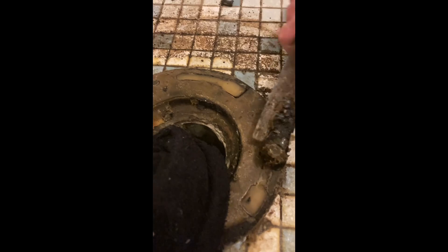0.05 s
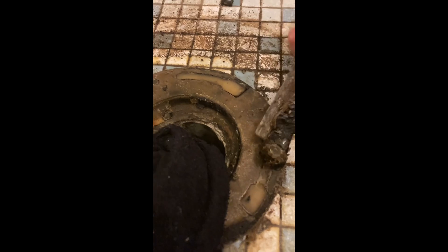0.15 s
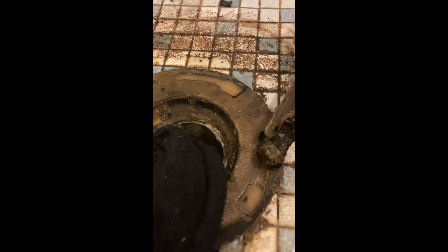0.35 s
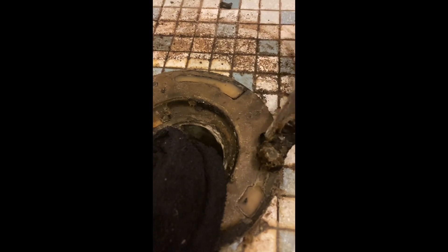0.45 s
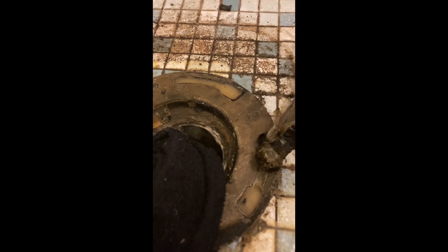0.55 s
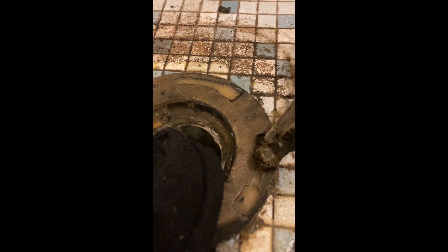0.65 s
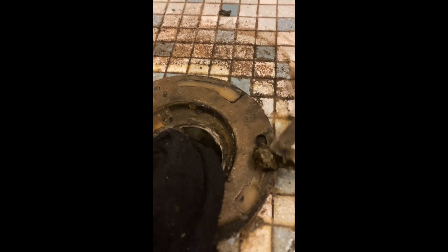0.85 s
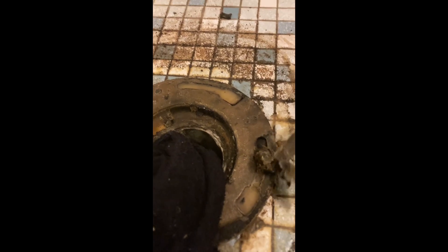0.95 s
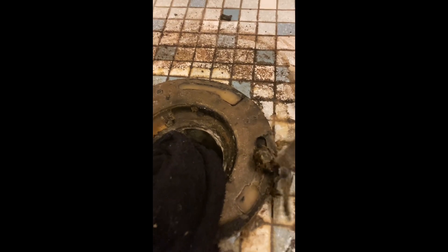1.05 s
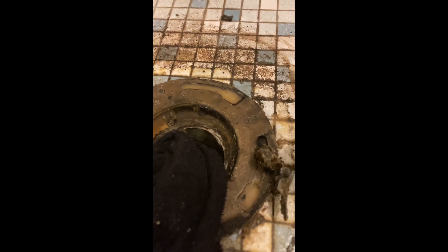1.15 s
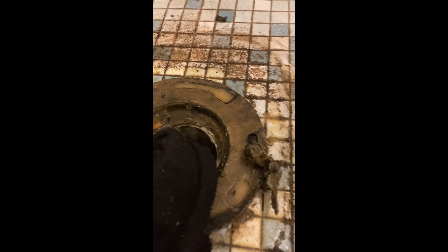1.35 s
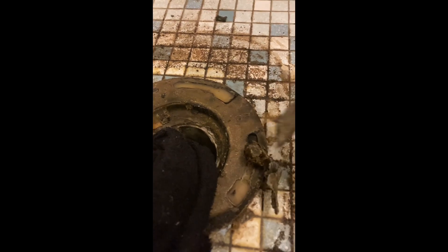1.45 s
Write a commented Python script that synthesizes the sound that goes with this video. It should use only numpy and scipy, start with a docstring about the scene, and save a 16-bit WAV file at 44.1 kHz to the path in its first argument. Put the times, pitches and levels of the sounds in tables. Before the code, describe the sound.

A steel scraper works at a crusted pipe flange, heard close in a small tiled room. A faint scrape leads into quick booming knocks and sharp cracks from 0.2 to 0.3 seconds. More crust snaps around 0.5 and 0.7 seconds, with soft bumps on tile. A gritty sliding hiss continues until about 1.5 seconds, with dull bumps near 1.15. A quiet low hum lies underneath.

```python
"""A faint scrape runs into a quick cluster of booming knocks and sharp cracks, then a gritty hiss.
A steel scraper is pushed into the caked rim (the flange) of a pipe on a tiled floor, in a small room.
The blade knocks the flange, which booms with its pipe, and bits of crust snap off.
The tool slides on, hissing over grime and bumping on the tiles.
A close pair of microphones hears it over a quiet room hum."""
import sys
import numpy as np
from scipy import signal
from scipy.fft import rfft, irfft
from scipy.io import wavfile

SR = 44100
rng = np.random.default_rng(int(sys.argv[2]) if len(sys.argv) > 2 else 0)


def store_pcm(level_fs):
    """Save levels as 16-bit WAV."""
    pcm = np.round(np.clip(level_fs, -1, 1) * 32767).astype(np.int16)
    wavfile.write(sys.argv[1], SR, np.atleast_2d(pcm).T)


N = 66150

# blows of the blade on the flange: t/s, level/dB, contact time/ms
FLANGE_BLOWS = [(.19, -47.5, 0.59), (.206, -36, 1.4), (.2232, -36.5, 0.88), (.2283, -29, 1.42),
                (.2832, -30.5, 3.95), (.51, -49.5, 3.5)]
# tones that the flange and pipe ring with: f/Hz, level/dB, time to fade by 60 dB/s
FLANGE_TONES = [(70.2, -26, 1), (104.5, -10.5, 0.27), (127.1, -1.5, 0.34), (149, -14, 0.56),
                (192.2, -12, 0.28), (235, -16.5, 0.32), (329.7, 0.5, 0.18), (377, -11, 0.06),
                (462, -2, 0.18), (575, -8.5, 0.14)]
def flange_knocks():
    """The blade hits the flange, which booms together with its pipe."""
    return strike(FLANGE_BLOWS, FLANGE_TONES)


# bumps of the tool on the tiles: t/s, level/dB, contact time/ms
TILE_BLOWS = [(.57, -51.5, 3.5), (.669, -62, 1.3), (.686, -46.5, 0.75), (.694, -48, 0.94), (.745, -50.5, 3),
              (.765, -51.5, 2.9), (1.131, -49, 2.75), (1.159, -43.5, 6.2), (1.19, -50, 7.3)]
# tones that the floor rings with: f/Hz, level/dB, time to fade by 60 dB/s
FLOOR_TONES = [(123.2, -5.5, 0.23), (181, 0.5, 0.055), (269, -3.5, 0.14), (333, -6, 0.25)]
def tile_bumps():
    """The tool bumps the tiles, and the floor answers with a dull ring."""
    return strike(TILE_BLOWS, FLOOR_TONES)


def strike(blows, tones):
    """Each blow is a short push that sets an object ringing; a longer contact sounds duller."""
    t, force = clock(), 0
    for start, db, contact_ms in blows:
        progress = np.clip((t - start) * 1000 / contact_ms, 0, 1)
        push = np.sin(np.pi * progress)
        force = force + undb(db) * push / push.sum()
    return ring(force, ringing_tones(tones) + floor_thump())


def floor_thump(centre_hz=350, width_octaves=.55, level_db=-7, fade_s=.2):
    """Floor tones too crowded to tell apart blend into one short, dull burst."""
    crowd = shape(noise(), lambda hz: np.exp(-.5 * (np.log2(hz / centre_hz) / width_octaves) ** 2))
    return undb(level_db) * unit(crowd) * die_away(fade_s)


# snaps of the crust: t/s, level/dB, time to fade to about a third/ms, lows compared with highs/dB
CRUST_SNAPS = [(.1, -63, 2.3, -12), (.1856, -50, 6.5, 8), (.2018, -33.5, 2.2, -9), (.206, -54, 5, 6),
               (.2157, -42.5, 5.5, -6), (.2228, -46.5, 12, 1), (.3044, -34, 1.2, -16),
               (.5117, -44.5, 2.5, -17), (.519, -53, 9, -10), (.539, -51, 11, -14), (.6601, -37.5, 2.4, -4),
               (.6682, -39.5, 2.4, -6), (.6756, -36.5, 3.2, -7), (.683, -37, 2.8, -11), (1.194, -61, 8, 3),
               (1.275, -54, 10, -9)]
def crumble(split_hz=5300, grit_db=3, rise_s=.0004):
    """The crust breaks in short gritty bursts, each with its own mix of lows and highs."""
    t, force = clock(), 0
    lows = signal.sosfilt(signal.butter(2, split_hz, fs=SR, output="sos"), grit(grit_db))
    highs = signal.sosfilt(signal.butter(2, split_hz, "high", fs=SR, output="sos"), grit(grit_db))
    for start, db, fade_ms, lows_db in CRUST_SNAPS:
        age = np.maximum(t - start, 0)
        rise = 1 - np.exp(-age / rise_s)
        fade = np.exp(-age * 1000 / fade_ms)
        force = force + undb(db) * rise * fade * (highs + undb(lows_db) * lows)
    return force


# tone colour of a snap: f/Hz, relative level/dB
SNAP_COLOUR = [(200, 11.5), (600, 4), (1100, 2.5), (2000, -4), (4000, 0), (5500, -6.5), (8200, -3),
               (10000, -9), (13000, -8.5), (16000, -15)]
# tones of the blade, cut short by the hand: f/Hz, relative level/dB, time to fade by 60 dB/s
BLADE_TONES = [(1000, -2, 0.04), (1304, -3, .05), (1520, 4, .05), (6000, 11, 0.01), (6650, 6, 0.014),
               (8200, 9, 0.01)]
def crust_cracks(blade_db=-3.5):
    """Each snap of the crust sounds in the open air and also sets the blade ringing."""
    snaps = 2 * colour(crumble(), SNAP_COLOUR)
    blade = ringing_tones(BLADE_TONES)
    blade = blade / np.sqrt(np.sum(blade ** 2))
    return snaps + undb(blade_db) * ring(crumble(), blade)


# how loud the hiss is as the push on the blade changes: t/s, level/dB
HISS_LEVELS = [(0, -81), (.13, -79), (.178, -69), (.22, -59.5), (.35, -70.5), (.42, -72), (.505, -66),
               (.55, -66.5), (.59, -68), (.637, -70), (.652, -56.5), (.684, -52.5), (.702, -63.5),
               (.88, -61.5), (1.05, -63), (1.25, -64.5), (1.28, -60.5), (1.33, -61.5), (1.43, -62),
               (1.5, -75)]
# tone colour of the hiss: f/Hz, relative level/dB
HISS_COLOUR = [(300, -10), (1000, -10), (1500, 3), (2600, 1.5), (3300, -2), (4400, -5.5), (8000, 2),
               (11000, -1), (13000, -7.5), (15500, -10)]
# rough tones that the rubbing brings out: start t/s, end t/s, f/Hz, width/Hz, level/dB
RUB_TONES = [(0.34, 0.66, 2310, 540, -78.5), (0.69, 1.51, 1756, 430, -70.5), (1.224, 1.9, 2460, 110, -68.5),
             (1.214, 1.56, 768, 72, -68), (1.227, 1.56, 409, 240, -68), (1.224, 1.348, 3320, 1200, -62),
             (1.115, 1.55, 4040, 2600, -72)]
def blade_slide(grit_db=2, flutter_db=1.5, rub_flutter_db=2, rub_fade_s=.069):
    """The edge drags over grime and tile: a gritty hiss with a few rough tones that come and go."""
    t = clock()
    loudness = undb(np.interp(t, *np.array(HISS_LEVELS).T))
    scrape = unit(colour(grit(grit_db), HISS_COLOUR)) * loudness
    for start, end, centre, width, db in RUB_TONES:
        fade_in_out = np.clip(np.minimum(t - start, end - t) / rub_fade_s, 0, 1)
        # keep the grit that lies near the tone's pitch
        tone = shape(grit(grit_db), lambda hz: 1 / (1 + 1j * (hz ** 2 - centre ** 2) / (hz * width)) ** 2)
        level = undb(db + rub_flutter_db * wander(turns_per_s=30))
        scrape = scrape + level * fade_in_out * unit(tone)
    return scrape * undb(flutter_db * wander(turns_per_s=45.11))


def grit(spread_db):
    """Countless tiny slips of very unequal size: noise whose level jumps every 8 samples."""
    sizes = np.repeat(noise(), repeats=8)[:N]
    return unit(noise() * undb(spread_db * sizes))


# how far a wave at the left microphone is ahead of the right: f/Hz, phase/rad
LEFT_LEAD = [(300, 0), (900, -2.1), (1300, -1.8), (1800, -1.3), (2400, -1.6), (3200, -2.1), (4500, -2.2),
             (5500, -3.1), (6500, -2), (7800, -.3), (9200, .1), (11300, 3), (12500, 3.3), (14000, 6.2)]
def microphones(sound, left_louder_db, echo_db):
    """A sound on the floor reaches the two microphones slightly out of step, along with its echo."""
    right = shape(sound, lambda hz: np.exp(-1j * look_up(hz, LEFT_LEAD)))
    balance = undb(np.array([[left_louder_db], [-left_louder_db]]) / 2)
    return np.array([sound, right]) * balance + undb(echo_db) * room_echo(sound)


# how long the room's echo lasts: f/Hz, time to fade by 60 dB/s
ECHO_TIMES = [(120, 0.62), (400, 0.66), (1500, 0.33), (5000, 0.081), (11000, 0.032)]
def room_echo(sound, shared_below_hz=420):
    """The tiled room smears a sound: lows last longest and are alike on both sides, highs are not."""
    sides = []
    shared_lows = shape(noise(), lambda hz: 1 / np.hypot(1, (hz / shared_below_hz) ** 2))
    for side in range(2):
        own_highs = shape(noise(), lambda hz: 1 / np.hypot(1, (shared_below_hz / hz) ** 2))
        tail = 0
        for band_hz, fade_s in ECHO_TIMES:
            share = [(f, float(f == band_hz)) for f, _ in ECHO_TIMES]
            band = shape(shared_lows + own_highs, lambda hz: look_up(hz, share))
            even_energy = np.sqrt(2 * np.log(1000) / fade_s / SR)  # a longer tail starts softer
            tail = tail + band * die_away(fade_s) * even_energy
        sides.append(ring(sound, tail))
    return np.array(sides)


# hum that is the same left and right: f/Hz, relative level/dB
HUM_SHARED = [(25, 11.5), (60, 11), (110, -2.5), (200, -11.5), (290, -15), (420, -3.5), (540, 3), (630, -7),
              (720, -23.5), (1100, -44), (2400, -21), (4000, -33.5), (16000, -83)]
# hum that swings opposite ways left and right: f/Hz, relative level/dB
HUM_OPPOSED = [(25, -31), (70, 1), (150, -21.5), (280, -21.5), (420, -5.5), (530, 0.5), (620, -9.5),
               (720, -20.5), (1100, -30.5), (2500, -37.5), (4000, -78), (16000, -38)]
def room_hum(shared_db=-62, opposed_db=-60.5):
    """The steady, low noise of the room."""
    shared = undb(shared_db) * unit(colour(noise(), HUM_SHARED))
    opposed = undb(opposed_db) * unit(colour(noise(), HUM_OPPOSED))
    return np.array([shared + opposed, shared - opposed])


def undb(db):
    """Turn decibels into a number to multiply by."""
    return 10 ** (np.asarray(db) / 20)


def unit(sound):
    """Scale a sound to an average strength (rms) of 1."""
    return sound / np.sqrt(np.mean(sound ** 2))


def clock():
    """The time of every sample, in seconds."""
    return np.arange(N) / SR


def noise():
    """Fresh white noise, an even hiss."""
    return rng.standard_normal(N)


def wander(turns_per_s):
    """A value that drifts up and down at random."""
    return np.interp(clock() * turns_per_s, np.arange(N), noise())


def die_away(fade_s):
    """A fade that drops by 60 dB in fade_s seconds."""
    return np.exp(-np.log(1000) * clock() / fade_s)


def ringing_tones(tones):
    """An object's answer to one sharp tap: pure tones that each die away."""
    t = clock()
    return sum(undb(db) * np.sin(2 * np.pi * hz * t) * die_away(fade_s) for hz, db, fade_s in tones)


def ring(sound, tap_answer):
    """Play a sound through an object or room, given its answer to one tap."""
    return signal.fftconvolve(sound, tap_answer)[:N]


def shape(sound, gain):
    """Multiply each frequency in a sound by gain(hz)."""
    hz = np.maximum(np.fft.rfftfreq(2 * N, 1 / SR), 1)
    return irfft(rfft(sound, 2 * N) * gain(hz))[:N]


def look_up(hz, points):
    """Read between rows of (f/Hz, value), with octaves evenly spaced."""
    freqs, values = np.array(points).T
    return np.interp(np.log(hz), np.log(freqs), values)


def colour(sound, points):
    """Turn frequencies up or down by rows of (f/Hz, level/dB)."""
    return shape(sound, lambda hz: undb(look_up(hz, points)))


def scene():
    """Knocks, bumps, cracks and sliding over the room hum."""
    thuds = microphones(flange_knocks() + tile_bumps(), left_louder_db=3.5, echo_db=-7.5)
    cracks = microphones(crust_cracks(), left_louder_db=-.5, echo_db=-11)
    slide = microphones(blade_slide(), left_louder_db=-.5, echo_db=-35.5)
    return thuds + cracks + slide + room_hum()


def record(dry):
    """The recorder cuts the deep bass and the very highest treble."""
    low_cut_hz, top_hz = 74, 15900
    thinned = signal.sosfilt(signal.butter(3, low_cut_hz, "high", fs=SR, output="sos"), dry)
    return signal.sosfilt(signal.ellip(8, .2, 70, top_hz, fs=SR, output="sos"), thinned)


dry = scene()
out = record(dry)
store_pcm(out)
```